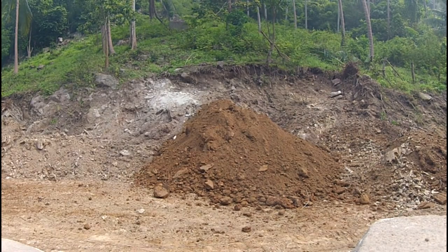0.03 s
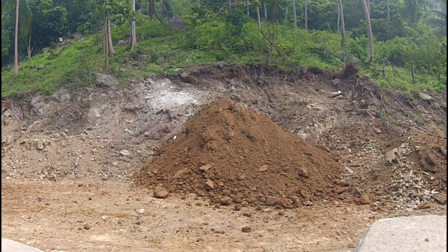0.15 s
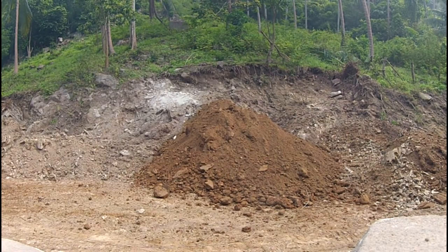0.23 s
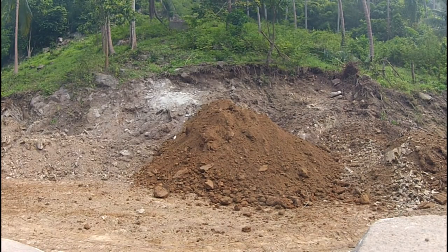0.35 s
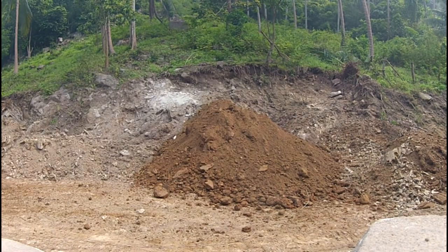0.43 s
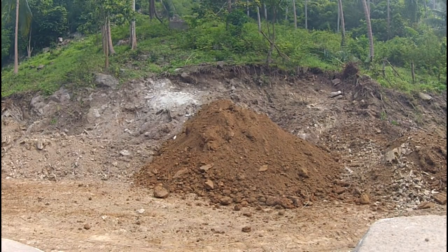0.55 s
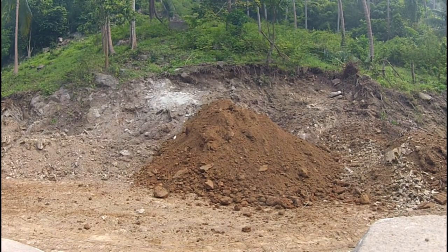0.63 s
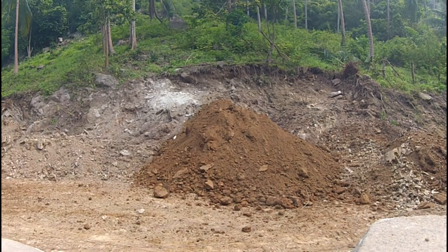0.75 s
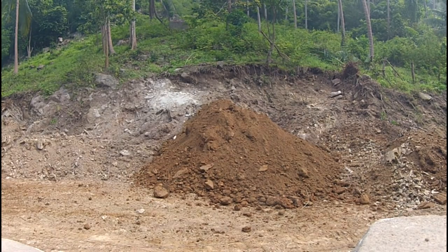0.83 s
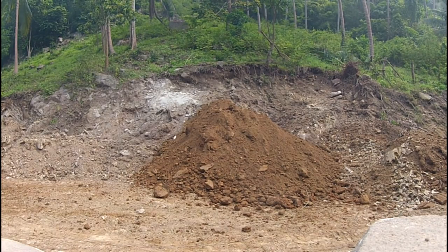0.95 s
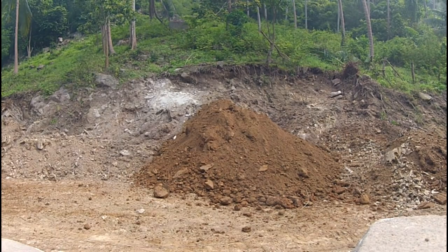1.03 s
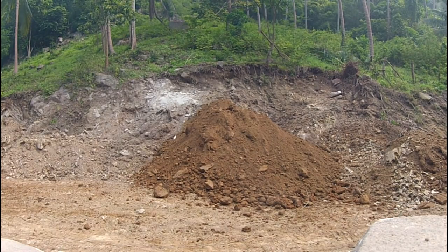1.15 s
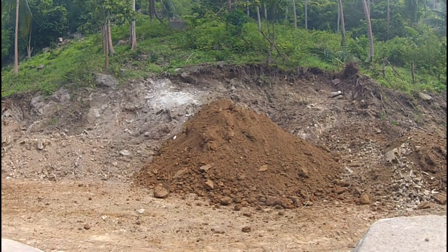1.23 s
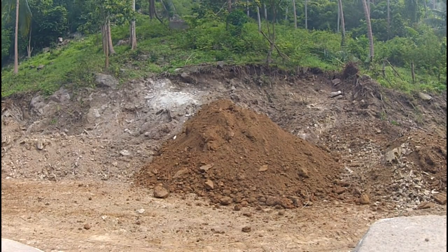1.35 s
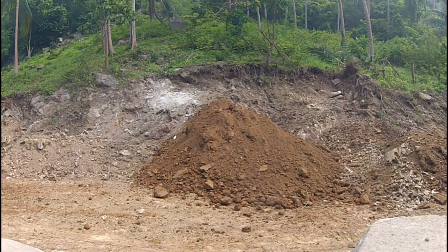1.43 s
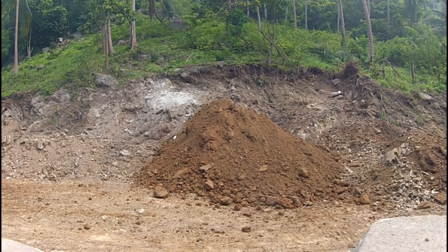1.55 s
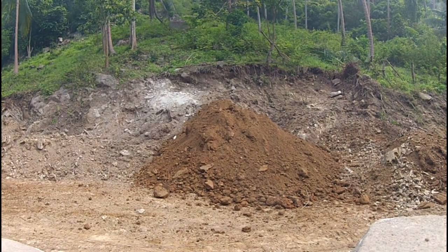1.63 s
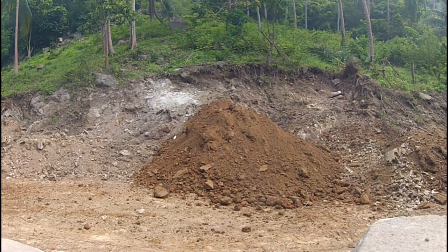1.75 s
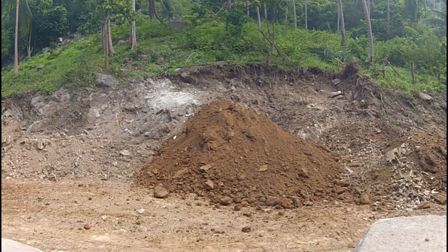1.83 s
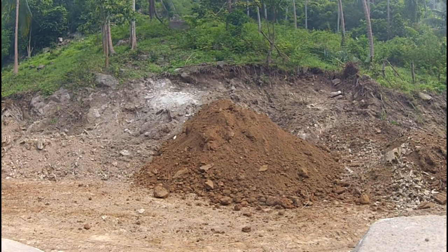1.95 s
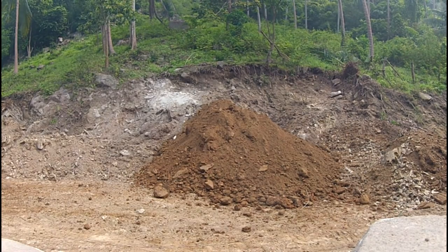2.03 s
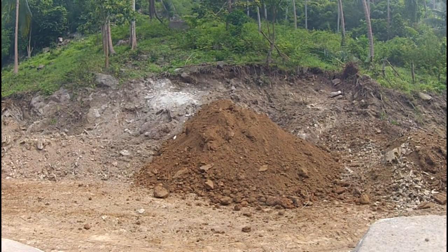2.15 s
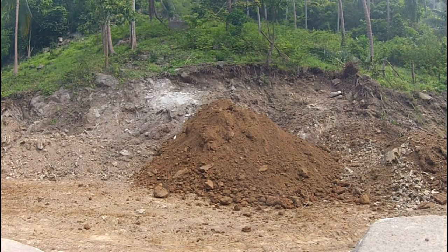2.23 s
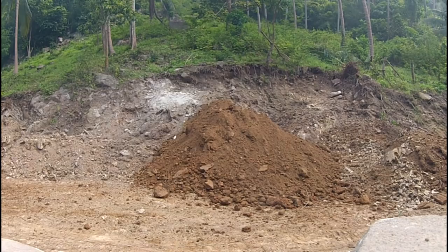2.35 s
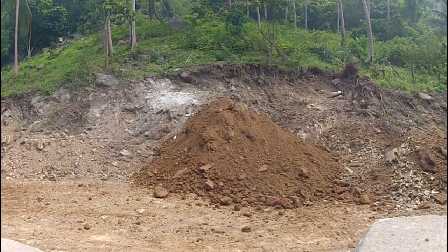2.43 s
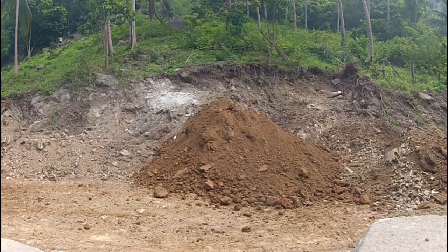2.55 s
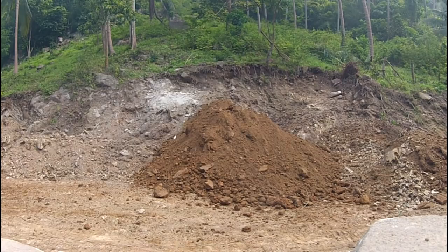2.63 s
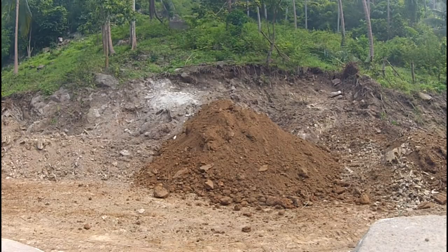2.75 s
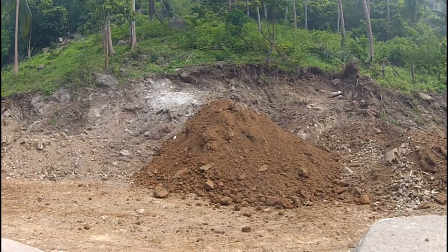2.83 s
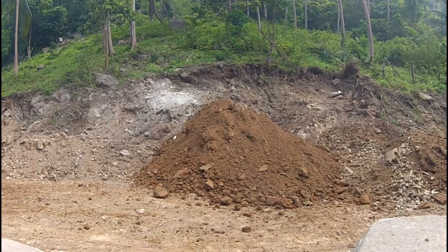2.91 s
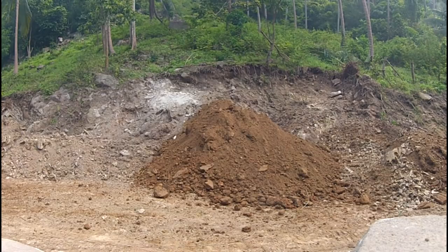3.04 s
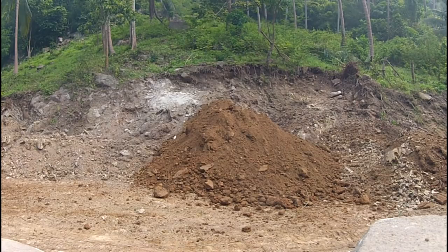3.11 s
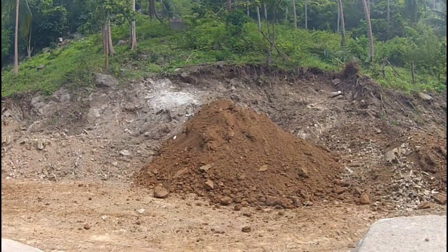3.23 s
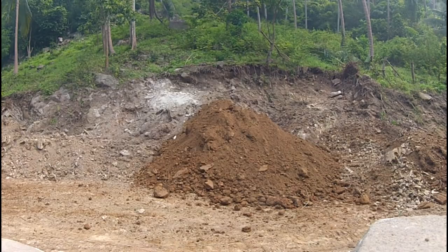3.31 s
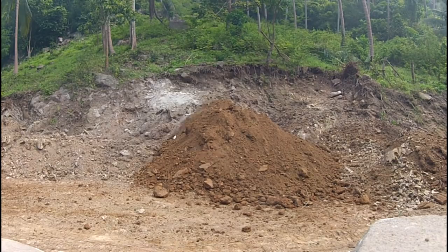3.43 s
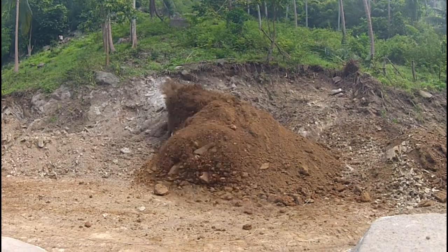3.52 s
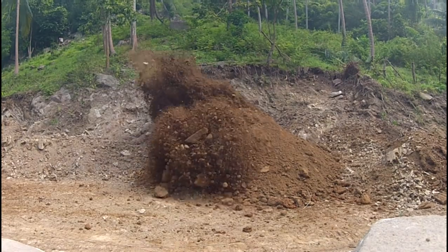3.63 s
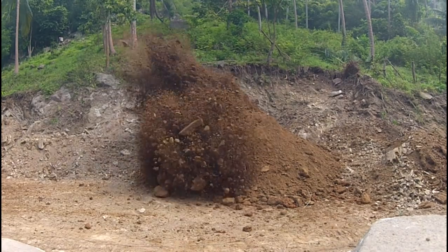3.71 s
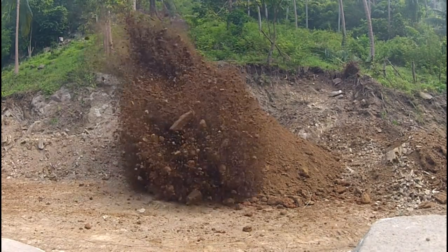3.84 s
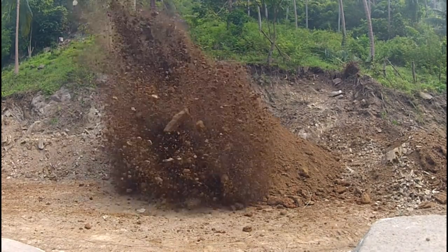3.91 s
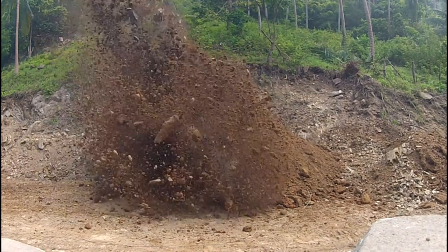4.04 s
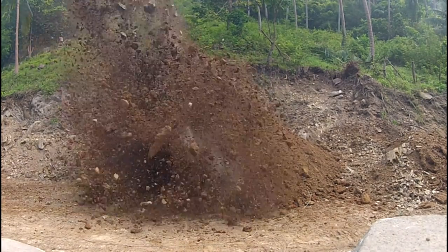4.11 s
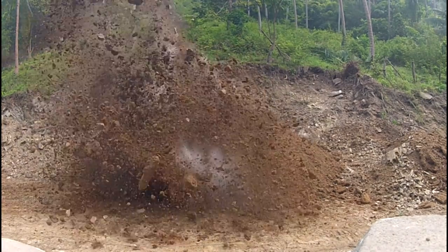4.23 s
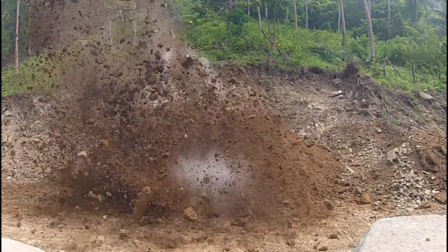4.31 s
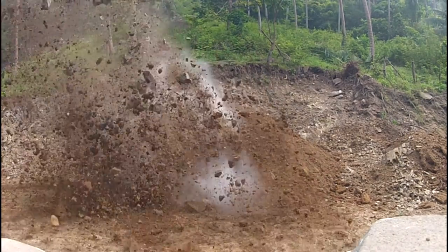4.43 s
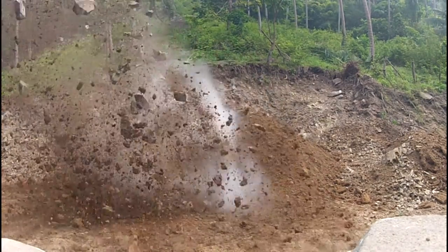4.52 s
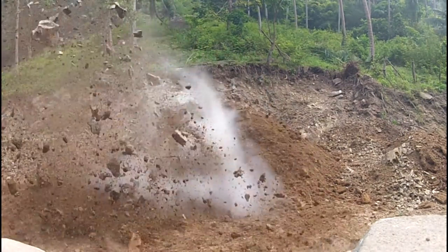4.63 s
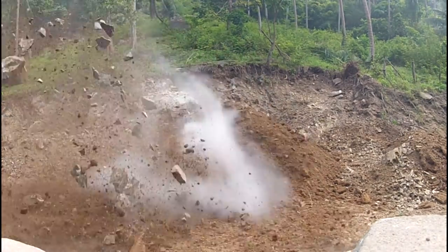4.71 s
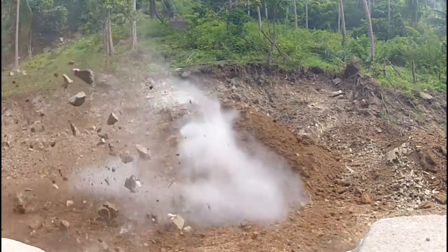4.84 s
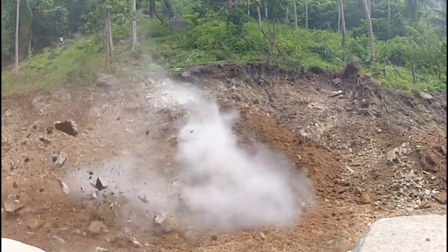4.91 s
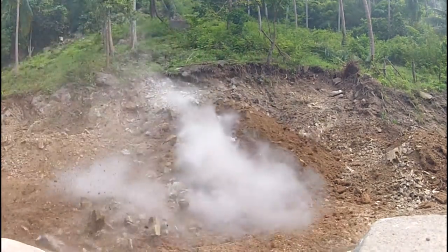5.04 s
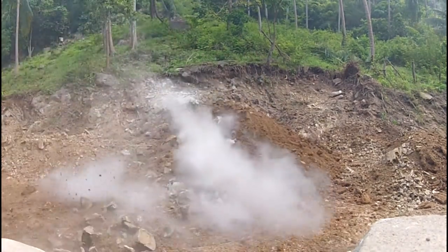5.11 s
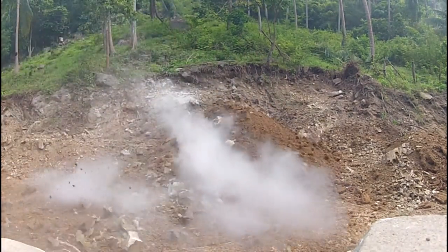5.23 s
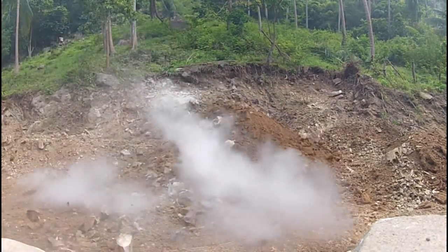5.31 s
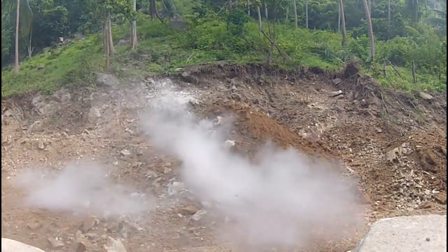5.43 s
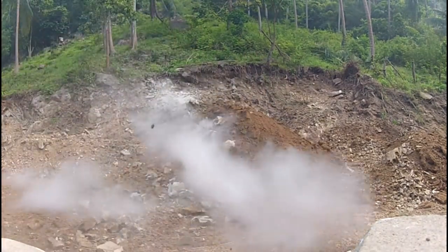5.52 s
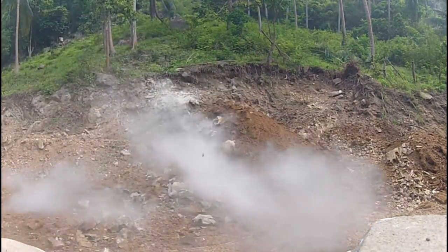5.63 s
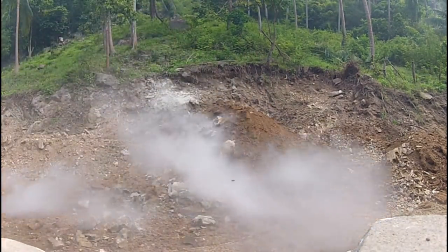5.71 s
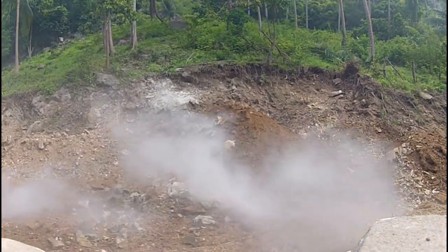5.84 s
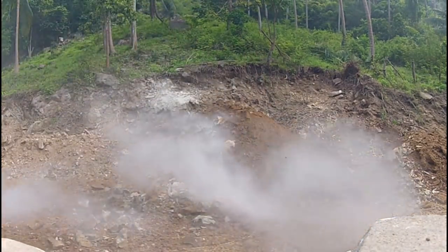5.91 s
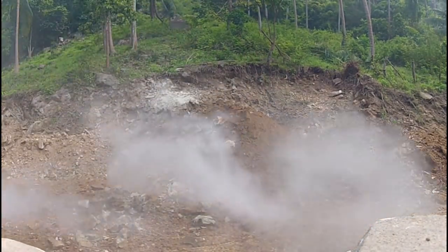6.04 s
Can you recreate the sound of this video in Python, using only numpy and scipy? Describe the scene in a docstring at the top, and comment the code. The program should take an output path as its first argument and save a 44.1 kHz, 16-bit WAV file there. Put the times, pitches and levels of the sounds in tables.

```python
"""A charge goes off under a heap of soil at the foot of a cut bank, outdoors: a muffled boom of brief
low swings, a crack, a gas puff and ground rumble overloads the microphone. Before it a nearby diesel,
a sum of firing orders over noise, drops to idle. After it filtered impacts and noise make earth slump
and grit shower down; clods thud as soft pressure swings and stones crack as well-damped modes."""
import sys
import numpy as np
from scipy import signal
from scipy.fft import rfft, irfft
from scipy.io import wavfile
from scipy.ndimage import uniform_filter1d

SR = 44100
rng = np.random.default_rng(int(sys.argv[2]) if len(sys.argv) > 2 else 0)


def dump_mix(stems):
    """Bounce the given channels to the path in sys.argv[1] as a 16-bit WAV at rate SR."""
    frames = np.atleast_2d(stems).T  # one column per channel
    limited = np.clip(frames, -1, 1)  # hard clip at full scale
    pcm = np.round(limited * 32767).astype(np.int16)
    wavfile.write(sys.argv[1], SR, pcm)


N = 267594
TIME = np.arange(N) / SR

# The boom and its returns from the bank and the trees.
# Each row: centre in seconds, peak in dB, pitch in Hz, length in cycles.
BOOM_SWINGS = [(3.4963, 13.5, 106, 0.26), (3.5072, -2, 91, 1), (3.5172, -6.5, 90, 0.58),
               (3.5305, -13, 151.6, 1)]


def amp(db):
    """Amplitude ratio of a level in dB."""
    return 10 ** (np.asarray(db) / 20)


def unit(x):
    """Scales to an rms of 1."""
    return x / np.sqrt(np.mean(x ** 2) + 1e-20)


def gains(spectrum, hz):
    """Reads (Hz, dB) points on a log-frequency axis."""
    point_hz, point_db = np.transpose(spectrum)
    return amp(np.interp(np.log(hz + 1), np.log(point_hz + 1), point_db))


def colour(x, spectrum, size=4096):
    """Causal minimum-phase filter with the given spectrum: it rings only after a click."""
    log_gain = np.log(gains(spectrum, abs(np.fft.fftfreq(size, 1 / SR))))
    min_phase = np.exp(np.conj(signal.hilbert(log_gain)))
    taps = np.fft.ifft(min_phase).real
    return signal.oaconvolve(x, taps[:size // 2])[:N]


def coloured_noise(spectrum):
    """Steady noise of the given spectrum with an rms of 1."""
    return unit(colour(rng.standard_normal(N), spectrum))


def drift(hz):
    """Slow chance with an rms of 1; its spectrum rolls off around the given rate."""
    f = np.fft.rfftfreq(N, 1 / SR)
    return unit(irfft(rfft(rng.standard_normal(N)) * np.exp(-(f / hz) ** 2), N))


def add(mix, s, sound):
    """Adds a sound into the mix at s seconds."""
    part = mix[round(s * SR):][:len(sound)]
    part += sound[:len(part)]


def engine():
    """Firing orders over a low roar; the orders slide down as the throttle closes."""
    # Each row: multiple of the firing rate, level at work in dB, level at idle in dB.
    orders = [(1, -40, -39.5), (2, -54.5, -64), (3, -51, -49.5), (4, -62, -88), (6, -71, -61.5)]
    # Exhaust roar and mechanical hiss. Each row: frequency in Hz, relative density in dB per Hz.
    roar_spectrum = [(15, -50), (35, -27), (48, -7), (63, -2.5), (80, 1.5), (125, 2), (200, -7.5),
                     (270, -5), (330, -19), (570, -20), (800, -28.5), (1100, -29.5), (2100, -40),
                     (3000, -39), (5000, -59.5)]
    work_hz, idle_hz = 97, 70.4
    throttle_s, coast_s, coast_shape = 2.8, 0.43, 1.4
    roar_work_db, roar_idle_db = -39.5, -43
    cut_db, cut_after_s, cut_width_s = -16, 0.24, 0.13
    drone_hz, drone_peak_s, drone_peak_db = 152.5, 2.9, -39.5
    drone_rise_db_per_s, drone_fade_db_per_s = 19, 80

    coasting_s = np.maximum(TIME - throttle_s, 0)
    idling = 1 - np.exp(-(coasting_s / coast_s) ** coast_shape)
    firing_hz = work_hz + (idle_hz - work_hz) * idling
    turns = np.cumsum(firing_hz * (1 + 0.0026 * drift(6.7))) / SR

    # with the fuel cut, the firing note sinks until the governor catches it
    sink_db = cut_db * np.exp(-((TIME - throttle_s - cut_after_s) / cut_width_s) ** 2)

    # a panel drones briefly while the engine runs down
    drone_drop_db = np.maximum(drone_rise_db_per_s * (drone_peak_s - TIME),
                               drone_fade_db_per_s * (TIME - drone_peak_s))
    drone_db = drone_peak_db - drone_drop_db + drift(19)
    hum = amp(drone_db) * np.cos(2 * np.pi * drone_hz * TIME)

    for k, order_work_db, order_idle_db in orders:
        db = order_work_db + idling * (order_idle_db - order_work_db)
        if k == 1:
            db = db + sink_db
        # an order swells as it slides through the pipe's resonance
        pipe_db = 6 * np.exp(-((k * firing_hz - 262) / 20) ** 2)
        waver_db = 1.8 * drift(7)
        hum += amp(db + pipe_db + waver_db) * np.cos(2 * np.pi * (k * turns + rng.random()))

    roar = coloured_noise(roar_spectrum) * (1 + 0.17 * np.cos(2 * np.pi * turns))
    roar_db = roar_work_db + (roar_idle_db - roar_work_db) * idling
    return np.sqrt(2) * hum + amp(roar_db) * roar


def air():
    """Faint outdoor hiss, with a thin high whine made of slow noise on a carrier."""
    whine_hz, whine_width_hz = 12030, 1000
    whine = unit(drift(whine_width_hz) * np.cos(2 * np.pi * whine_hz * TIME))
    hiss = coloured_noise([(1000, -14), (2600, 0), (4500, 2.5), (9000, -5), (15000, -14)])
    return amp(-67.5) * whine + amp(-67) * hiss


def blows(rows, delay_s=0):
    """Soft blows: each is one smooth swing of pressure that lasts about as long as the contact."""
    out = np.zeros(N)
    t = np.arange(-2048, 2048) / SR
    for s, db, hz, cycles in rows:
        swing = np.sin(2 * np.pi * hz * t) * np.exp(-(hz * t / cycles) ** 2)
        add(out, s + delay_s + t[0], amp(db) * swing / abs(swing).max())
    return out


def boom():
    """The soil smothers the shock to one low swing with a thin crack; gas puffs, the ground rumbles on."""
    shot_s = BOOM_SWINGS[0][0]
    age_s = np.maximum(TIME - shot_s, 0)

    crack = coloured_noise([(400, -5), (2500, 7), (6000, -8), (10000, -16), (15000, -35)])
    front = np.exp(-((TIME - shot_s) / 0.0012) ** 2)

    puff = coloured_noise([(60, -8), (170, 10), (450, -12), (1000, -21), (3000, -44), (15000, -51)])
    puff_decay = (age_s > 0) * amp(-60 * age_s / 0.14)

    ground = coloured_noise([(18, -1), (32, 13), (50, -4), (85, 9), (130, 1), (300, -43)])
    swell = age_s / 0.19 * np.exp(1 - age_s / 0.16)

    return (blows(BOOM_SWINGS) + amp(-20.5) * crack * front
            + amp(-6) * puff * puff_decay + amp(-23.5) * ground * swell ** 2)


def sizzle(x):
    """The fastest swings of pressure make the microphone sizzle thinly for an instant."""
    speed = uniform_filter1d(abs(np.gradient(x)), size=24)
    fizz = coloured_noise([(2000, -19), (4000, -10), (10000, -19), (11500, 10), (12600, 7),
                           (14000, -22), (16000, -31)])
    return amp(2.5) * np.minimum(speed, 0.12) * fizz


def landings():
    """Clods land with a soft push topped by a shorter, harder contact; heavy lumps only thump."""
    # Each row of both: time in seconds, peak in dB, pitch in Hz, length in cycles.
    # Clods' pushes and contacts come a few ms after the listed time.
    clod_thuds = [(3.505, -12.5, 700, 1), (3.808, -21, 374, 1), (4.291, -13, 664, 0.74),
                  (4.336, -11, 623, 0.57), (4.367, -12.5, 634, 1), (4.416, -2, 785, 0.47),
                  (4.664, -4, 444, 0.49), (4.685, -8, 407, 0.29), (4.726, -8.5, 427, 1),
                  (4.735, -5, 470, 0.4), (4.855, -13, 670, 1), (4.884, -3.5, 400, 0.36),
                  (4.923, -8, 460, .75), (4.936, 2.5, 361, 0.99), (4.952, -1.5, 610, 0.97),
                  (5.022, -12.5, 393, 0.81), (5.277, -13, 377, .48), (5.354, -22.5, 594, 1),
                  (5.457, -5, 330, 0.29), (5.539, -1.5, 587, 0.79), (5.726, -22.5, 600, 0.67),
                  (5.829, -18.5, 700, 0.58)]
    lump_thumps = [(3.686, -12.5, 90, .7), (3.805, -21, 69.4, .95), (4.44, -11.5, 131, 0.64),
                   (4.773, -20, 90, .45), (4.783, -18, 111, 0.59), (4.809, -18, 127, 0.56),
                   (4.858, -8.5, 61, 0.25), (4.936, -11.5, 139, .93), (5.024, -9.5, 238, 0.79),
                   (5.272, -17.5, 221, 0.46), (5.499, -19, 101, 0.38), (5.51, -13, 91, 0.62)]
    contacts = [(s, db - 12.5, 1.17 * hz, 0.45) for s, db, hz, _ in clod_thuds]
    pushes = blows(clod_thuds, delay_s=0.00404)
    return pushes + blows(contacts, delay_s=0.00371) + blows(lump_thumps)


def steady_fall(crest_s, db, rise_db_per_s, fade_db_per_s):
    """Level of one kind of debris: it builds to a rounded crest and thins out."""
    rounding_s = 0.74
    slope = np.where(TIME < crest_s, rise_db_per_s, fade_db_per_s)
    return amp(db - slope * (np.hypot(TIME - crest_s, rounding_s) - rounding_s))


def fall():
    """Levels of earth, clods and grit: the steady fall, and a quick surge for every slump."""
    # Masses of loose soil that burst or come down. Each row: start in seconds, time to the peak
    # in seconds, earth level in dB, clod level in dB, grit level in dB.
    slumps = [(3.515, 0.041, -20, -32.5, -41.5), (3.68, 0.038, -30, -36, -40), (3.77, 0.029, -29, -38, -40),
              (3.909, 0.033, -27, -31.5, -39), (3.989, 0.045, -35, -26.5, -30.5),
              (4.278, 0.028, -24.5, -24.5, -25), (4.364, 0.054, -31.5, -23, -25.5),
              (4.466, 0.037, -17, -28, -32.5), (4.655, 0.031, -22.5, -23, -26),
              (4.754, 0.035, -15.5, -20.5, -26), (4.825, 0.035, -18, -19, -23),
              (4.94, 0.032, -23, -27, -47), (5.005, 0.051, -23.5, -24, -25.5),
              (5.09, 0.039, -24, -26, -26.5), (5.438, 0.028, -29, -33.5, -41.5),
              (5.59, .045, -34.5, -37, -52)]
    earth = steady_fall(crest_s=5, db=-30.5, rise_db_per_s=2.5, fade_db_per_s=26.5)
    clods = steady_fall(crest_s=4.5, db=-27.5, rise_db_per_s=22.5, fade_db_per_s=25.5)
    grit = steady_fall(crest_s=4.5, db=-28, rise_db_per_s=47.5, fade_db_per_s=26)
    for s, rise_s, earth_db, clods_db, grit_db in slumps:
        age = np.maximum(TIME - s, 0) / rise_s
        surge = (age * np.exp(1 - age)) ** 2
        earth = np.hypot(earth, amp(earth_db) * surge)
        clods = np.hypot(clods, amp(clods_db) * surge)
        grit = np.hypot(grit, amp(grit_db) * surge)
    return earth, clods, grit


def shower(per_s, spread_db):
    """Random impacts of either sign; a few are much larger than the rest."""
    size = amp(spread_db * np.minimum(rng.exponential(1, N), 4))
    sign = rng.choice([-1., 1.], N)
    lands = rng.random(N) < per_s / SR
    return unit(size * sign * lands)


def debris(earth_level, clod_level, grit_level):
    """Earth rumbles back down, small clods patter, and grit rains in clumps with pebbles among it."""
    # Each row of all three: frequency in Hz, relative density in dB per Hz.
    earth_spectrum = [(20, -42), (40, 0), (70, 2.5), (140, 4.5), (220, -4.5), (400, -28.5), (900, -58)]
    clod_spectrum = [(80, -20), (200, 2), (400, 2.5), (700, 0.5), (1000, -6.5), (1600, -14), (4000, -53)]
    grit_spectrum = [(300, 2.5), (900, -4), (1500, -2.5), (2200, 0), (3100, 1.5), (3800, -4.5), (5200, -3),
                     (7500, -10), (9500, -9.5), (15000, -16)]
    airborne = np.clip((TIME - 3.51) / 0.02, 0, 1)
    earth = unit(colour(shower(per_s=540, spread_db=4), earth_spectrum))
    clods = unit(colour(shower(per_s=900, spread_db=3), clod_spectrum))
    grains = shower(per_s=2500, spread_db=2) + 1.01 * rng.standard_normal(N)
    clumps = grains * amp(drift(105))
    pebbles = shower(per_s=120, spread_db=6.5)
    grit = unit(colour(clumps + amp(-4) * pebbles, grit_spectrum))
    return airborne * (earth * earth_level + clods * clod_level + grit * grit_level)


def small_stones(grit_level, count):
    """Random rows for cracks(): smaller stones, their strength following the grit level at that moment."""
    from_s, to_s = 3.9, 5.6
    over_grit_db, spread_db, ring_hz, knock_db = 13.5, 1, 2460, -16
    when, size, ring = rng.random((count, 3)).T
    s = from_s + (to_s - from_s) * (np.arange(count) + when) / count
    grit_db = 20 * np.log10(np.interp(s, TIME, grit_level))
    db = grit_db + over_grit_db + spread_db * (2 * size - 1)
    hz = ring_hz * 1.63 ** (ring - 0.5)
    return [(*row, knock_db) for row in zip(s, db, hz)]


def cracks(rows):
    """A stone snaps its well-damped modes, amid a short crunch and a dull knock."""
    # Each row: multiple of the stone's ring, level in dB, t60 in seconds.
    stone_modes = [(1, -1, 0.0089), (1.33, -6, 0.0064), (1.8, -15, .003), (3.2, -4.5, 0.0015),
                   (4.6, -5, 0.0016)]
    full_knock_s, crunch_db = 0.0021, -14.5
    halving_db = 13.5  # harder contacts knock less and end sooner
    out = np.zeros(N)
    t = np.arange(2048) / SR
    since_s = np.maximum(t - 0.0018, 0)  # grit is crushed before the stones themselves meet
    dull = signal.butter(2, [600, 1900], "band", fs=SR, output="sos")
    for s, db, hz, knock_db in rows:
        detune = 1 + 0.047 * rng.uniform(0.17, 1, len(stone_modes))
        snap = np.zeros(len(t))
        for (ratio, mode_db, t60_s), d in zip(stone_modes, detune):
            decay = amp(mode_db - 60 * since_s / t60_s)
            snap += decay * np.sin(2 * np.pi * hz * ratio * d * since_s)
        knock = unit(signal.sosfilt(dull, rng.standard_normal(len(t))))
        crunch = unit(signal.lfilter([1], [1, -0.35], rng.laplace(size=len(t))))
        length_s = full_knock_s * 2 ** (knock_db / halving_db)
        contact = (t / length_s / 2) ** 2 * np.exp(2 - t / length_s)
        crush = (amp(knock_db) * knock + amp(crunch_db) * crunch) * contact
        add(out, s - 0.0004, amp(db) * (snap / abs(snap).max() + crush))
    return out


def bank(x):
    """Rough earth and trees scatter an echo: sparse random taps under an exponential decay."""
    t = np.arange(SR // 2) / SR
    sparse = rng.standard_normal(len(t)) * (rng.random(len(t)) < 2000 / SR)
    taps = sparse * (t > 0.004) * amp(-60 * t / 0.21)
    echo = signal.oaconvolve(x, taps / np.linalg.norm(taps))[:N]
    return colour(echo, [(100, 5), (2500, 14), (12000, 30.5)])


def scene():
    """Engine and air throughout; the shot, the falling debris, and a faint echo of the hits."""
    # The larger stones striking stones.
    # Each row: time in seconds, snap peak in dB, nominal ring in Hz, dull knock in dB re the snap.
    large_stones = [(4.0456, -14.5, 2900, -5), (4.1788, -10.5, 2100, -14), (4.239, -10.5, 2900, -23),
                    (4.2968, -5, 2150, -11), (4.3685, -8, 2300, -9.5), (4.4782, -11, 2800, -11),
                    (4.587, -9.5, 2370, -10), (4.6815, -2.5, 2860, -21), (4.6863, -3.5, 2480, -16),
                    (4.7036, -5, 2620, -27), (4.7207, -3, 2100, -16), (4.7373, 0, 2270, -20),
                    (4.8083, -3, 2960, -19), (4.8449, -7, 1860, -10.5), (4.9344, 0.5, 4040, -20.5),
                    (4.996, -9.5, 2030, -13.5), (5.0413, -7, 1920, -8.5), (5.0619, -3.5, 2150, -22),
                    (5.1175, -5, 2590, -23), (5.2629, -13, 2650, -21), (5.4999, -21.5, 3050, -21),
                    (5.5415, -30, 1870, -8), (5.7265, -18, 2080, -13), (5.8315, -33.5, 1830, -4.5),
                    (5.91, -26.5, 2750, -23)]
    earth, clods, grit = fall()
    thuds = landings()
    hits = thuds + cracks(large_stones + small_stones(grit, count=26))
    shot = boom() + sizzle(blows(BOOM_SWINGS) + thuds)
    falling = debris(earth, clods, grit)
    return (engine() + air() + shot + falling + hits + amp(-38.5) * bank(hits))[None]


def lag(x, seconds):
    """Follows x with the given time constant."""
    keep = np.exp(-1 / (seconds * SR))
    return signal.lfilter([1 - keep], [1, -keep], x)


def record(dry):
    """The port colours the sound; overloads duck the gain for a moment and clip flat; then a band limit."""
    # Microphone behind its port. Each row: frequency in Hz, gain in dB.
    port_response = [(20, -2.5), (520, 1), (730, 3), (1000, -6.5), (1500, -4.5), (2100, 4), (5200, -5),
                     (6000, -19.5), (6700, -4), (9900, 2.5), (10800, -12.5), (11500, -1), (12600, -4.5),
                     (13300, -2), (14500, 2.5), (15200, 6.5), (16000, -44)]
    limit_db, sense_s, duck_s, recover_db_per_s = -12.5, 0.0093, 0.012, 148
    heard = colour(dry[0], port_response)
    power_db = 10 * np.log10(lag(np.clip(heard, -1, 1) ** 2, sense_s) + 1e-12)
    excess_db = np.maximum(power_db - limit_db, 0)
    # instant attack, then a straight recovery in dB
    recovery_db = recover_db_per_s * TIME
    duck_db = np.maximum.accumulate(excess_db + recovery_db) - recovery_db
    clipped = np.clip(heard * amp(-lag(duck_db, duck_s)), -1, 1)
    band_limit = signal.firwin(255, 16500, window=("kaiser", 9), fs=SR)
    return signal.oaconvolve(clipped, band_limit, "same")[None]


dry = scene()
out = record(dry)
dump_mix(out)
```